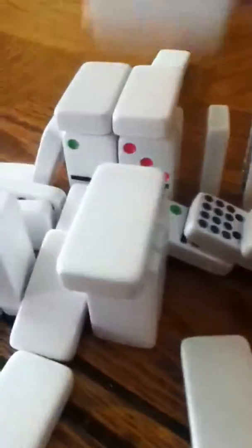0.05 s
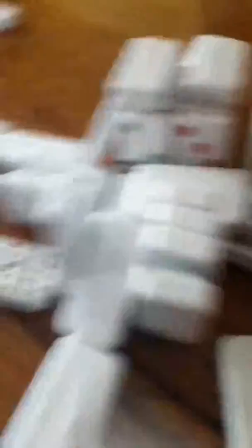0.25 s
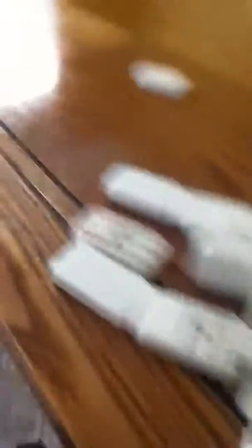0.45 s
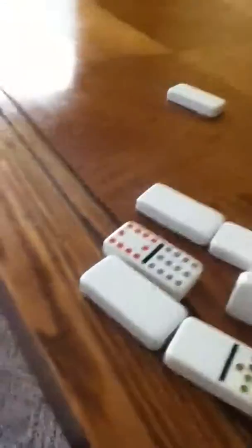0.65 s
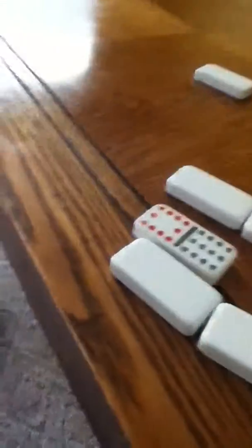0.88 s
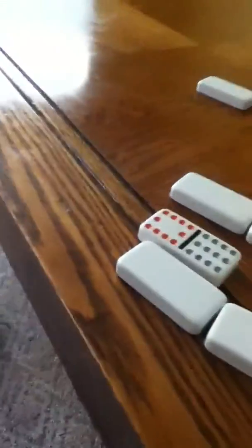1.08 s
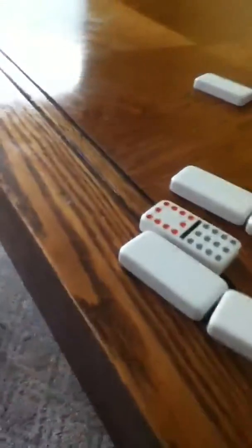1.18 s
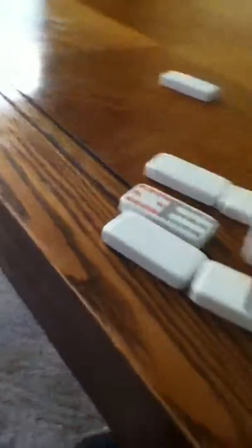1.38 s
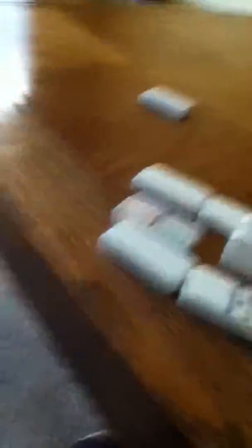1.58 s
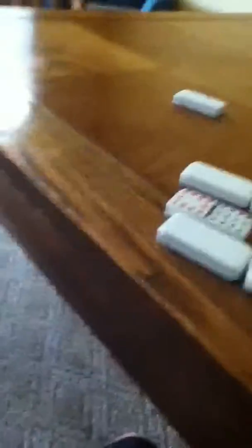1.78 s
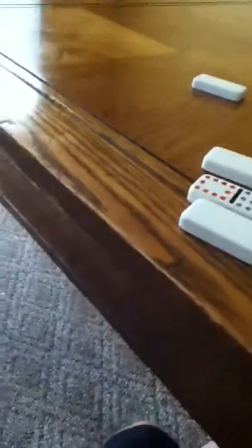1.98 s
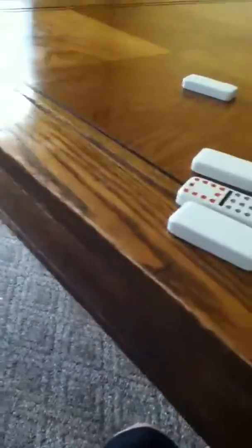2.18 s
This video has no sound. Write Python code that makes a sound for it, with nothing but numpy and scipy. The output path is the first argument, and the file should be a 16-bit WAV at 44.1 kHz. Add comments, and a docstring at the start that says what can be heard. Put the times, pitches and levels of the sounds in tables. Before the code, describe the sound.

Dominoes collapse onto a wooden table, close by in a small room. From about 0.2 seconds, the tiles clink against each other and hit the wood in a dense, bright clatter. From 0.7 seconds they bounce in rapid hard clacks, stopping near 1.2 seconds. Soft, dull settling knocks come around 1.4 seconds, then a few faint handling ticks between 1.7 and 2.2 seconds over a low room hum.

```python
"""Dominoes collapsing on a wooden table.

Close by in a small room, tiles clink against each other, then land and bounce for a second.
A clink is a snap, face chatter and a high tile mode; a landing is a click that rings table and tile.
Soft bumps, dull settling knocks and faint handling ticks follow over the room's low hum."""
import sys
import numpy as np
from scipy import signal
from scipy.fft import rfft, irfft, next_fast_len
from scipy.io import wavfile
from scipy.ndimage import map_coordinates

SR = 44100
rng = np.random.default_rng(int(sys.argv[2]) if len(sys.argv) > 2 else 0)


def unload_audio(sound):
    """Save the sound as a 16-bit wav file, at the path given as the first command line argument."""
    columns = np.transpose(np.atleast_2d(sound))
    # keep every value between -1 and 1, then stretch to whole-number steps
    steps = np.round(np.clip(columns, -1, 1) * 32767)
    wavfile.write(sys.argv[1], SR, steps.astype(np.int16))


N = 99225
EVENT_SAMPLES, LEAD_S = 8192, .003  # buffer of one event; contact comes LEAD_S into it
T = np.arange(EVENT_SAMPLES) / SR
HZ = np.fft.rfftfreq(EVENT_SAMPLES, 1 / SR)


def amp(db):
    """Decibels to gain."""
    return 10 ** (np.asarray(db) / 20)


def unit_rms(x, size=None):
    """Rms 1 over the first size samples."""
    return x / np.sqrt(np.mean(x[:size] ** 2) + 1e-20)


def curve_at(points, hz):
    """Interpolate (f/Hz, value) points over log frequency."""
    f, values = np.transpose(points)
    return np.interp(np.log(hz + 1), np.log(f + 1), values)


def noise(spectrum, size=EVENT_SAMPLES):
    """Coloured noise, rms 1."""
    colour = amp(curve_at(spectrum, np.fft.rfftfreq(size, 1 / SR)))
    return unit_rms(irfft(rfft(rng.standard_normal(size)) * colour, size))


def fade(t60_s, attack_s=.0001, t=T):
    """Quick rise at contact, exponential decay."""
    age = np.maximum(t - LEAD_S, 0)
    return np.exp(-np.log(1000) * age / t60_s) * (1 - np.exp(-age / attack_s))


def swell(delay_s, rise_s, fall_s):
    """Exponential rise and fall, joined delay_s after contact."""
    age = np.clip(T - LEAD_S - delay_s, -.02, .03)
    return 2 * np.exp(-np.logaddexp(-age / rise_s, age / fall_s))


def add(out, at_s, event):
    """Mix in an event with its contact at at_s."""
    start = max(0, round((at_s - LEAD_S) * SR))
    out[start:start + len(event)] += event[:max(0, N - start)]


def ring(modes):
    """Damped modes, excited a little differently by each blow."""
    return sum(amp(db + rng.normal(0, 2.5)) * fade(t60_s) * np.sin(2 * np.pi * (hz * T + rng.random()))
               for hz, db, t60_s in modes)


# room air spectrum: f/Hz, relative density/dB
AIR_SPECTRUM = [(25, -13), (50, -4), (90, 0), (200, 1), (420, -1), (550, -5), (1000, -9), (3000, -16),
                (6000, -20), (10000, -22), (15500, -20)]
# room air envelope: t/s, level/dB
AIR_LEVEL = [(0, -61), (.2, -61), (1.6, -60), (2.25, -57.5)]
# hum partials: f/Hz, mean level/dB
HUM_PARTIALS = [(92, -74), (190, -68), (362, -72)]
def background():
    """Room air and a faint hum that wavers in level and phase."""
    t = np.arange(N) / SR
    drift = lambda: map_coordinates(rng.standard_normal(size=40), [t * 8])  # 8 random points per second
    hum = sum(amp(db + 3 * drift()) * np.sqrt(2) * np.sin(2 * np.pi * hz * t + 1.4 * drift())
              for hz, db in HUM_PARTIALS)
    air_db = np.interp(t, *np.transpose(AIR_LEVEL))
    return amp(air_db) * noise(AIR_SPECTRUM, size=N) + hum


# reverb decay: f/Hz, t60/s
ROOM_T60 = [(200, .5), (1000, .52), (2000, .52), (4500, .4), (9000, .35), (15000, .15)]
# reverb colour: f/Hz, relative level/dB
ROOM_COLOUR = [(500, -1), (2000, 0), (5000, -1.5), (9500, -4), (12000, -12)]
def room(x, wet_db=0):
    """Direct sound, early reflections and tail; each call stands for a different spot."""
    hz, frame_s, bands = signal.stft(rng.standard_normal(size=32768), SR, nperseg=256)
    colour = amp(curve_at(ROOM_COLOUR, hz))[:, None]
    decay = np.exp(-np.log(1000) * frame_s / curve_at(ROOM_T60, hz)[:, None])
    tail = signal.istft(bands * colour * decay, SR, nperseg=256)[1]
    t = np.arange(len(tail)) / SR
    onset = 1 - np.exp(-(t / .007) ** 2)
    tail = tail * onset / np.sqrt(SR / 25)
    early = noise(ROOM_COLOUR, size=len(t)) * fade(t60_s=.09, t=t) * onset
    response = amp(wet_db) * (amp(-10.3) * tail + amp(-18) * early / np.linalg.norm(early))
    response[0] = 1  # direct path
    return signal.fftconvolve(x, response)


# soft bumps: t/s, level/dB, f/Hz
BUMPS = [(.383, -41, 110), (.385, -36, 430), (.408, -42, 170), (.625, -47, 80), (1.39, -38, 110),
         (1.415, -44, 135), (1.495, -50, 95), (2.135, -53, 80)]
def bumps():
    """Soft thuds during and after the fall, each a damped low sine."""
    out = np.zeros(N)
    for at_s, db, hz in BUMPS:
        add(out, at_s, amp(db) * fade(t60_s=.12, attack_s=.003) * np.sin(2 * np.pi * hz * T))
    return out


# settling knocks: t/s, level/dB
SETTLES = [(1.372, -52), (1.404, -44), (1.436, -47), (1.4405, -44)]
# their spectrum: f/Hz, relative level/dB
SETTLE_SPECTRUM = [(150, -14), (500, -7), (1100, 0), (1700, -3), (3000, -18), (8000, -40)]
def settling():
    """Things settle after the fall in dull bursts of noise."""
    out = np.zeros(N)
    for at_s, db in SETTLES:
        add(out, at_s, amp(db) * fade(t60_s=.045, attack_s=.001) * noise(SETTLE_SPECTRUM))
    return out


# handling ticks: t/s, level/dB
TICKS = [(1.741, -39), (1.769, -42), (1.935, -52), (2.047, -39), (2.215, -40.5)]
# their spectrum: f/Hz, relative level/dB
TICK_SPECTRUM = [(150, 2), (700, 4), (1500, 0), (3000, -3), (5000, -1), (8500, -6), (12000, -18),
                 (16000, -26)]
def handling_ticks():
    """Small ticks: a sharp noise burst with a weak tail."""
    out = np.zeros(N)
    for at_s, db in TICKS:
        envelope = fade(t60_s=.004) + amp(-15) * fade(t60_s=.04)
        add(out, at_s, amp(db) * envelope * noise(TICK_SPECTRUM))
    return out


def click(hz):
    """Push and pull of air as a tile is stopped; a harder contact is shorter."""
    phase = 2 * np.pi * hz * (T - LEAD_S)
    pulse = -np.sin(phase) * np.exp(-(phase / 2.8) ** 2)
    return pulse / pulse.max()


# tile bending modes: f/Hz, level/dB, t60/s
TILE_MODES = [(8400, -2, .032), (9400, 0, .034), (10400, -10, .015)]
def tile_ring():
    """One tile rings; no two have quite the same pitch."""
    detune = 1 + rng.normal(0, .022)
    return ring([(hz * detune, db, t60_s) for hz, db, t60_s in TILE_MODES])


def wood_flex(click_hz, end_ratio=.45, sink_s=.004):
    """The wood under a tile rings briefly, sinking in pitch."""
    age = np.maximum(T - LEAD_S, 0)
    glide = end_ratio + (1 - end_ratio) * np.exp(-age / sink_s)
    hz = click_hz * np.exp(rng.normal(0, .08)) * glide
    return amp(-12.5) * fade(t60_s=.028, attack_s=.0008) * np.sin(2 * np.pi * np.cumsum(hz) / SR)


# table-top resonances: f/Hz, relative level/dB
TABLE_MODES = [(490, -19), (575, -16), (830, -16), (1183, -7), (1290, -7), (1399, -2), (1626, 0), (1798, 0),
               (2029, 2), (2514, 0), (3114, -2), (3296, -3), (3949, -6)]
# bending-wave spectrum for a 3200 Hz click: f/Hz, relative level/dB
WAVE_SPECTRUM = [(60, -50), (200, -40), (450, -32), (800, -21), (1300, -5.5), (2000, 0), (3200, -1),
                 (5000, -6), (7000, -15), (10000, -29), (16000, -50)]
def table_top(click_hz, echoes=24, span_s=.014, echo_t60_s=.03):
    """Bending waves return from the table's edges, treble first, and settle into its modes."""
    delay_s = span_s * (np.arange(1, echoes + 1) - rng.random(size=echoes))[:, None] / echoes  # at 2 kHz
    gain = rng.standard_normal(delay_s.shape) * np.exp(-np.log(1000) * delay_s / echo_t60_s)
    cycles = 2 * delay_s * np.sqrt(HZ * 2000) + HZ * LEAD_S  # wave speed grows as sqrt(f)
    colour = amp(curve_at(WAVE_SPECTRUM, HZ * (3200 / click_hz) ** .5))
    waves = irfft(colour * (gain * np.exp(-2j * np.pi * cycles)).sum(0))
    modes = [(hz, db, .27 * (1500 / hz) ** .6) for hz, db in TABLE_MODES]  # t60 .27 s at 1.5 kHz
    return amp(-21.5) * unit_rms(waves, size=348) + amp(-37) * ring(modes)


# spells of jostling: start/s, end/s, contacts/(1/s), mean level/dB
JOSTLES = [(.215, .36, 130, -22.5), (.36, .45, 90, -25), (.57, .71, 90, -27)]
def jostle(typical_hz=3500):
    """Many light contacts among the sliding tiles as the stack gives way."""
    out = np.zeros(N)
    for start_s, end_s, rate, db in JOSTLES:
        for slot_s in np.arange(start_s, end_s, 1 / rate):
            hz = typical_hz * np.exp(rng.normal(0, .25))
            touch = click(hz) + table_top(hz) + amp(-11) * tile_ring() + wood_flex(hz)
            add(out, slot_s + rng.random() / rate, amp(db + rng.normal(0, 3)) * touch)
    return room(out)[:N]


# tile hits tile: t/s, relative snap level/dB, snap f/Hz, relative ring level/dB, ring f/Hz
CLINKS = [(0.2246, -14, 4000, -23, 9250), (0.2405, -15, 5900, -11, 8500), (0.2492, -12, 4200, -18, 8500),
          (0.278, -17, 4300, -27, 8310), (0.2879, -16, 4400, -27, 8270), (0.3031, -12, 3300, -17, 8660),
          (0.3181, -18, 3100, -27, 9700), (0.3271, -9, 5000, -15, 8560), (0.333, -7, 5200, -18, 8500),
          (0.3681, -12, 3900, -24, 8880), (0.3824, -11, 3800, -9, 9570), (0.3923, -12, 4700, -24, 8430),
          (0.4302, -11, 4600, -18, 8900), (0.4318, -11, 4400, -19, 8480), (0.4408, -6, 4800, -27, 8770),
          (0.4911, -13, 4500, -34, 8500), (0.4922, -3, 5700, -22, 8400), (0.518, -23, 3400, -35, 8360),
          (0.5615, -7, 4450, -11, 8800), (0.5707, -16, 6500, -17, 8960), (0.5879, -8, 6400, -18, 9440),
          (0.6007, -5, 3300, -17, 9210), (0.6288, -11, 3800, -19, 8320), (0.6332, -14, 4800, -19, 8370),
          (0.6388, -16, 4800, -24, 8740), (0.6546, -3, 6600, -19, 8620), (0.6804, -17, 3400, -29, 8490),
          (0.6904, -20, 4800, -24, 8450)]
# chatter of two faces in contact: f/Hz, relative level/dB
CHATTER_SPECTRUM = [(200, -18), (700, -7), (1500, -1), (3000, 0), (5500, 0), (7200, -3), (9500, -1),
                    (11500, -7), (16000, -17)]
def clinks():
    """Tile on tile: a bright snap inside a brief chatter that pumps one high mode."""
    out = np.zeros(N)
    for at_s, snap_db, snap_hz, ring_db, ring_hz in CLINKS:
        snap = amp(.5) * fade(t60_s=.0045, attack_s=.00005) * np.sin(2 * np.pi * snap_hz * (T - LEAD_S))
        chatter = amp(-14) * swell(delay_s=0, rise_s=.0004, fall_s=.0011) * noise(CHATTER_SPECTRUM)
        gritty_mode = np.sin(2 * np.pi * ring_hz * T) + amp(-11) * noise(CHATTER_SPECTRUM)
        pumping = amp(1.5) * swell(delay_s=.0004, rise_s=.00025, fall_s=.0016)
        ringing = pumping * gritty_mode + amp(-9) * tile_ring()
        clink = amp(snap_db) * (snap + chatter) + amp(ring_db) * ringing
        add(out, at_s, room(clink, wet_db=-2))
    return out


# tile hits table: t/s, click level/dB, nominal f/Hz, relative thump level/dB, relative ring level/dB
LANDINGS = [(0.2096, -4, 2750, -33, -17), (0.2214, -13, 2220, -34, -24), (0.2351, -15, 3800, -42, -30),
            (0.2531, -3, 2750, -31, -26), (0.3335, -10, 2500, -33, -33), (0.3714, -4, 3250, -40, -35),
            (0.384, -12, 2300, -29, -30), (0.4076, -11, 3700, -35, -46), (0.432, -9, 2700, -48, -32),
            (0.4766, -6, 2100, -26, -44), (0.5651, -5, 2760, -33, -33), (0.6109, -4, 2650, -37, -44),
            (0.629, -9, 2500, -36, -33), (0.667, -4, 3290, -38, -32), (0.6699, -10, 4160, -42, -33),
            (0.7037, -11, 2830, -37, -48), (0.7313, -6, 3150, -37, -37), (0.7405, -6, 3100, -33, -36),
            (0.7727, -6, 3000, -39, -43), (0.7741, -8, 3400, -42, -47), (0.8169, -15, 3120, -44, -48),
            (0.8341, -5, 3070, -42, -37), (0.8465, -4, 3170, -37, -34), (0.8533, -8, 3260, -40, -33),
            (0.8569, -4, 3170, -41, -37), (0.8923, -9, 2840, -43, -40), (0.9075, -11, 3050, -45, -41),
            (0.93, -4, 3420, -43, -34), (0.9323, -10, 3660, -45, -40), (0.9416, -5, 3150, -41, -37),
            (0.9567, -12, 3110, -45, -39), (0.9761, -10, 3370, -48, -36), (0.9913, -6, 3160, -44, -38),
            (1.0028, -4, 3420, -45, -44), (1.004, -10, 3510, -46, -50), (1.0144, -7, 3310, -44, -40),
            (1.0369, -9, 3090, -45, -46), (1.0463, -11, 3020, -47, -46), (1.0506, -7, 3480, -47, -46),
            (1.063, -5, 3400, -42, -45), (1.0764, -7, 2990, -44, -49), (1.0906, -6, 3500, -44, -42),
            (1.103, -5, 3400, -39, -41), (1.1086, -8, 3540, -44, -42), (1.117, -11, 2680, -41, -48),
            (1.1332, -11, 2990, -40, -46), (1.138, -6, 3300, -42, -40), (1.142, -10, 2850, -41, -53),
            (1.1581, -14, 3300, -42, -50)]
# low thump of the table: f/Hz, relative level/dB
THUMP_SPECTRUM = [(50, -4), (150, -4), (300, -6), (520, -5), (900, -3), (1300, 0), (1900, -6), (4000, -36)]
def landings():
    """Tiles land on the wood: a click, the table's answer, a low thump and the tile's own ring."""
    out = np.zeros(N)
    for at_s, click_db, hz, thump_db, ring_db in LANDINGS:
        crack = amp(-18) * fade(t60_s=.0015) * rng.standard_normal(EVENT_SAMPLES)
        blow = click(hz * .94) + crack + wood_flex(hz) + table_top(hz)
        thump = unit_rms(fade(t60_s=.055, attack_s=.001) * noise(THUMP_SPECTRUM), size=428)
        landing = amp(click_db) * blow + amp(thump_db - 6.5) * thump + amp(ring_db - 2.5) * tile_ring()
        add(out, at_s, room(landing))
    return out


def scene():
    """Tiles, soft knocks and ticks, and the room's background, in mono."""
    radiation = signal.butter(2, 220, "high", fs=SR, output="sos")  # small objects radiate little bass
    tiles = signal.sosfilt(radiation, landings() + clinks() + jostle())
    soft_sounds = room(bumps() + settling() + handling_ticks())[:N]
    return (tiles + soft_sounds + background())[None]


# microphone treble roll-off: f/Hz, gain/dB
MIC_RESPONSE = [(9900, 0), (11000, -4), (14000, -6), (16000, -12)]
def record(dry, ceiling_db=-2.5, cutoff_hz=16200):
    """Round the highest peaks, dull the treble and limit the band."""
    limited = dry / (1 + np.abs(dry / amp(ceiling_db)) ** 10) ** (1 / 10)
    size = next_fast_len(N + EVENT_SAMPLES)
    hz = np.fft.rfftfreq(size, 1 / SR)
    response = amp(curve_at(MIC_RESPONSE, hz)) * (hz < cutoff_hz)
    return irfft(rfft(limited, size) * response, size)[:, :N]


dry = scene()
out = record(dry)
unload_audio(out)
```